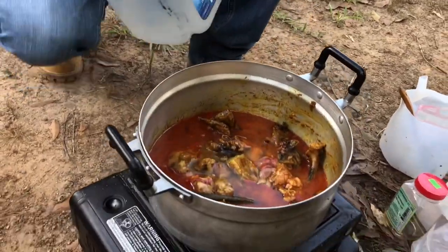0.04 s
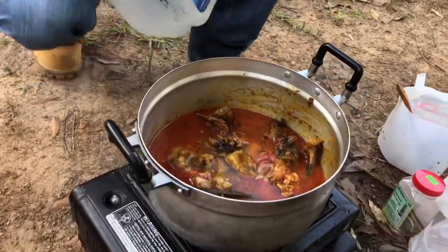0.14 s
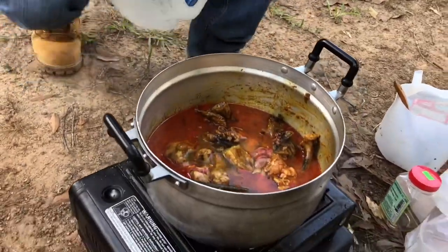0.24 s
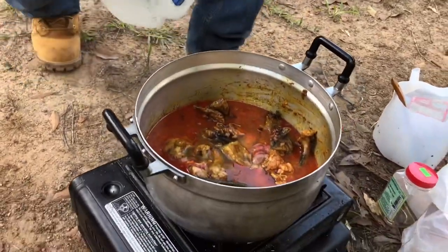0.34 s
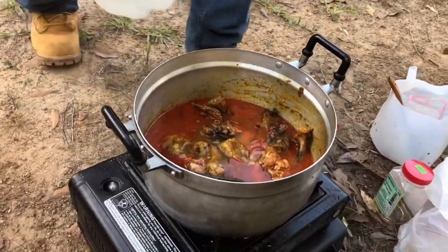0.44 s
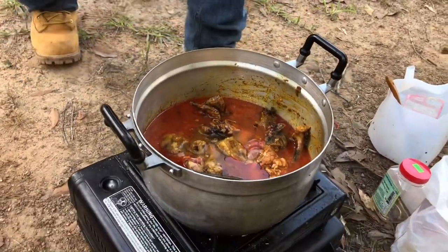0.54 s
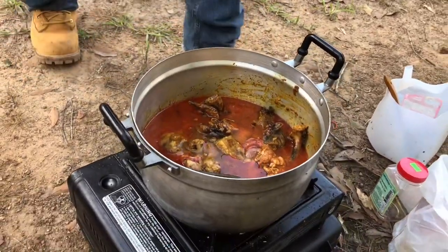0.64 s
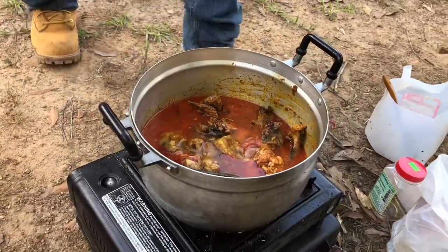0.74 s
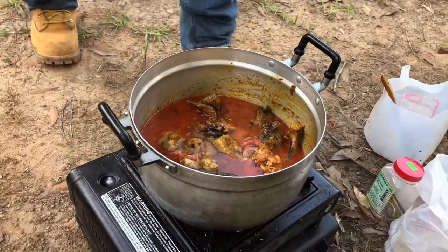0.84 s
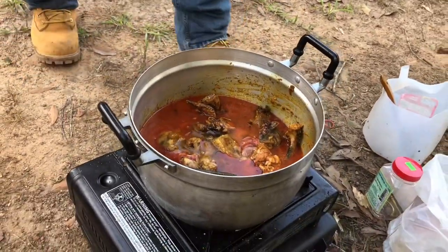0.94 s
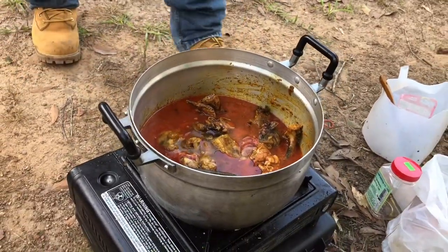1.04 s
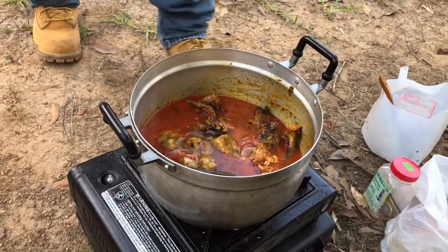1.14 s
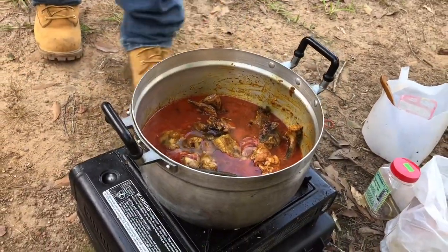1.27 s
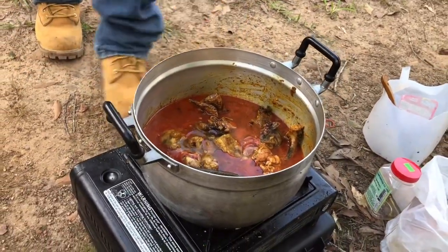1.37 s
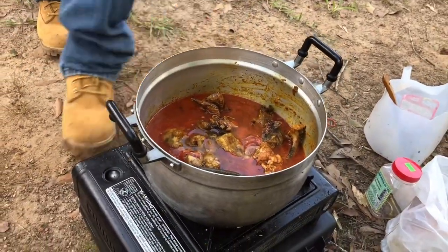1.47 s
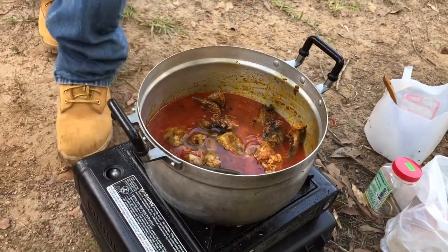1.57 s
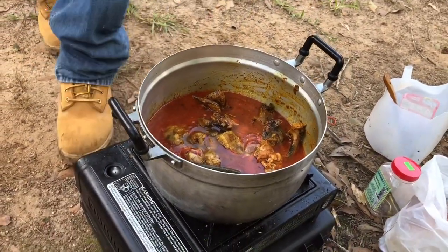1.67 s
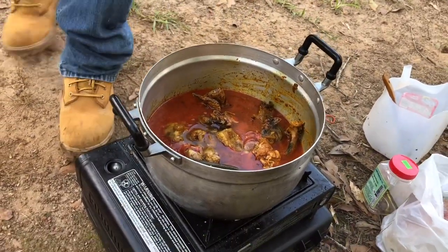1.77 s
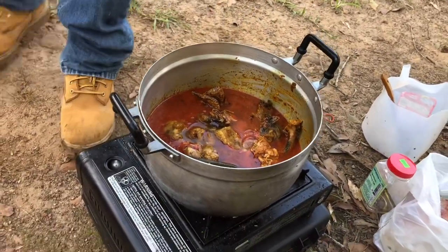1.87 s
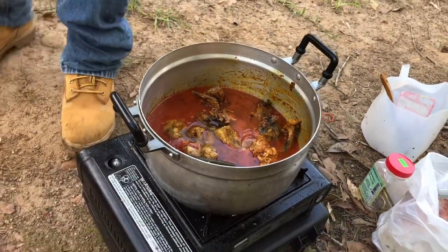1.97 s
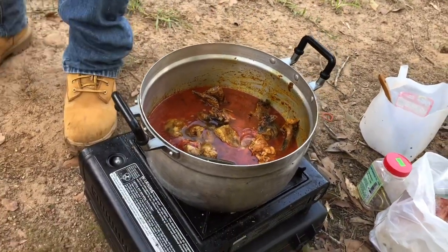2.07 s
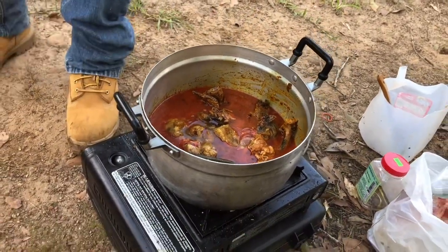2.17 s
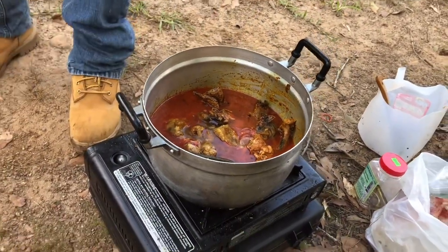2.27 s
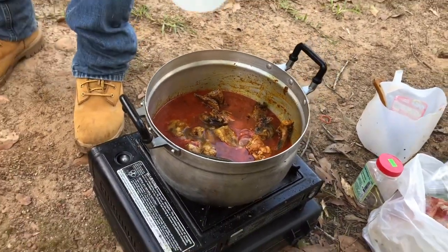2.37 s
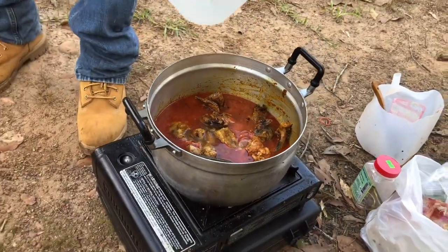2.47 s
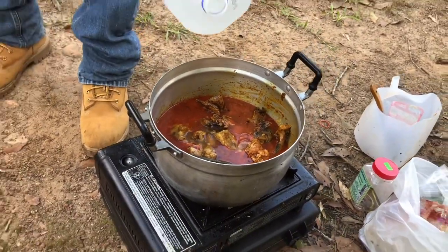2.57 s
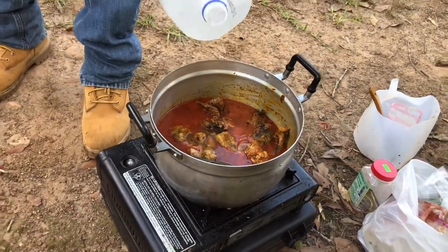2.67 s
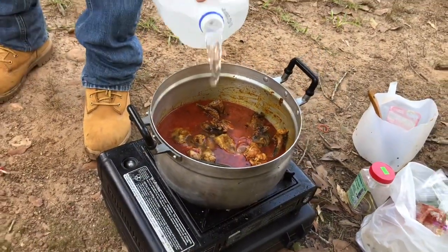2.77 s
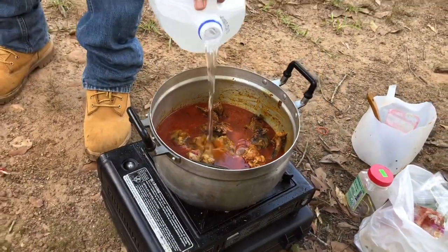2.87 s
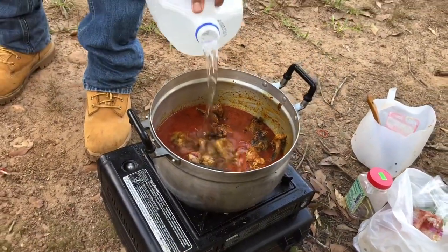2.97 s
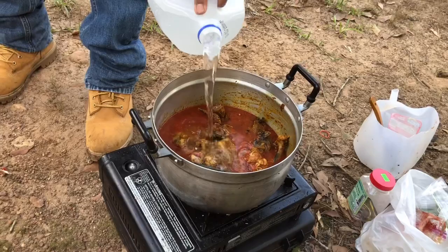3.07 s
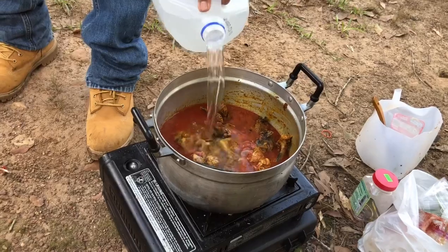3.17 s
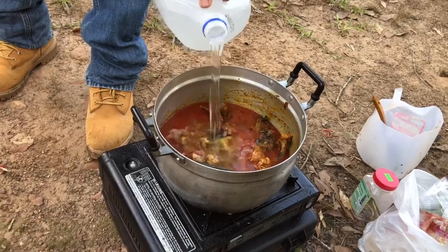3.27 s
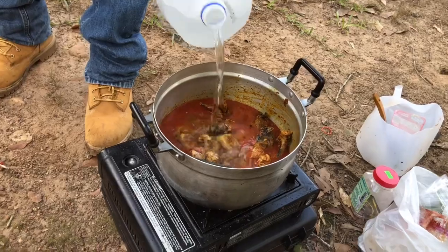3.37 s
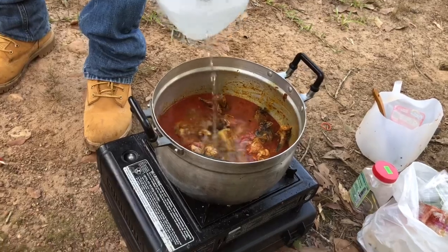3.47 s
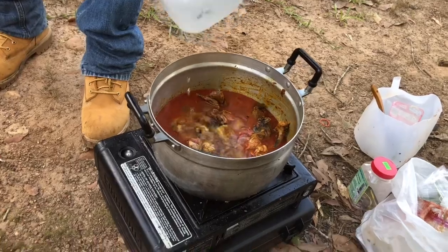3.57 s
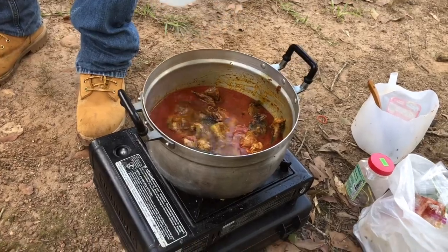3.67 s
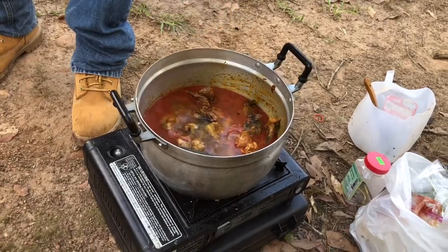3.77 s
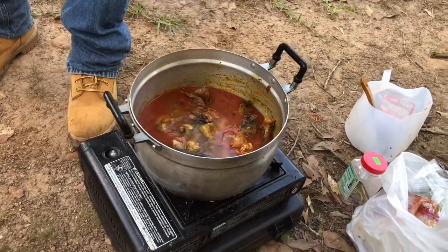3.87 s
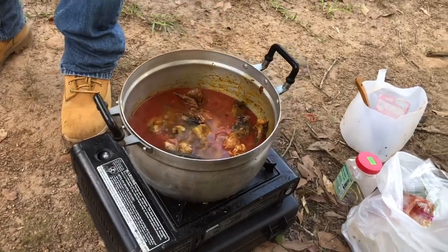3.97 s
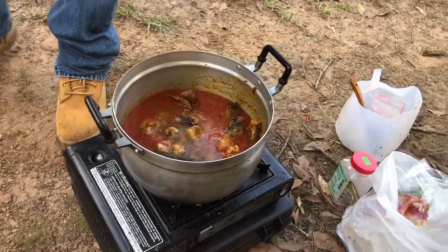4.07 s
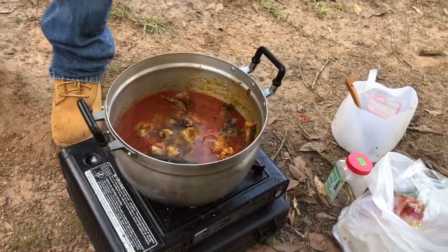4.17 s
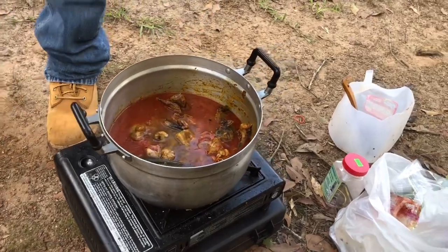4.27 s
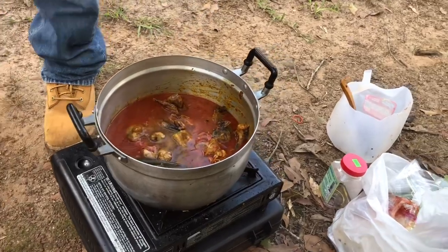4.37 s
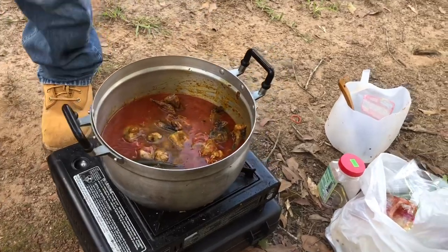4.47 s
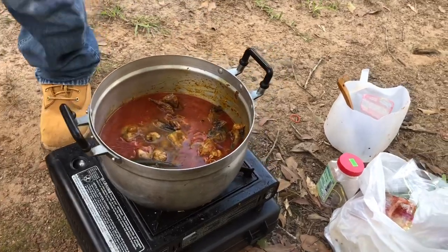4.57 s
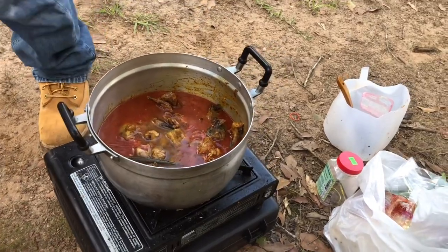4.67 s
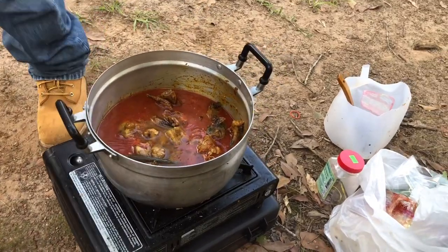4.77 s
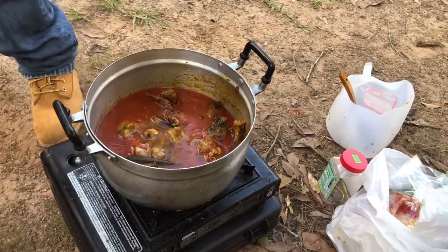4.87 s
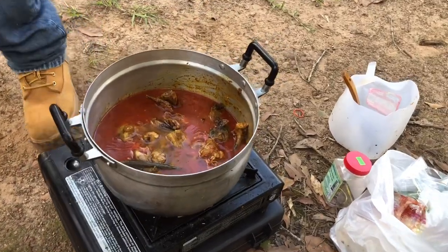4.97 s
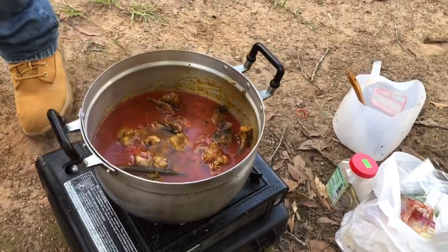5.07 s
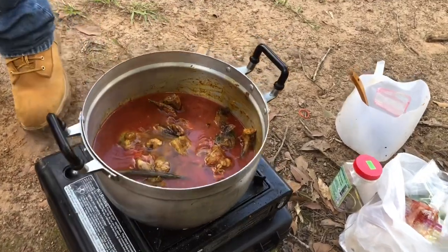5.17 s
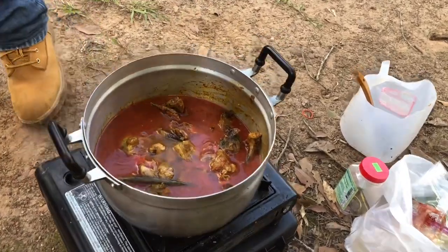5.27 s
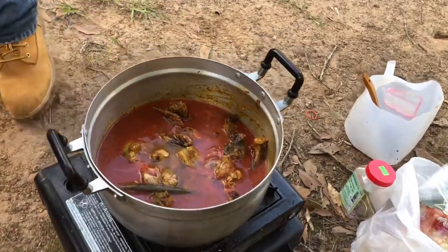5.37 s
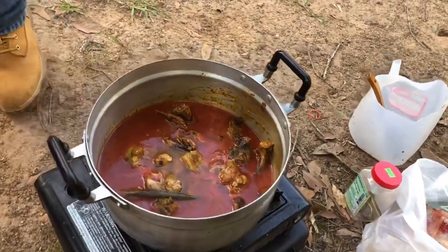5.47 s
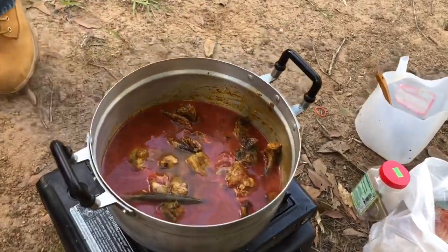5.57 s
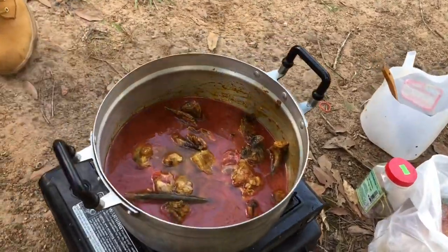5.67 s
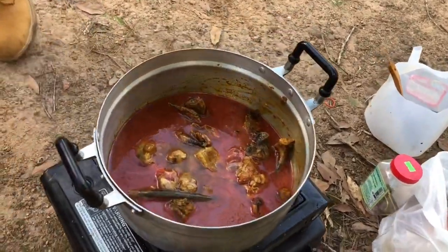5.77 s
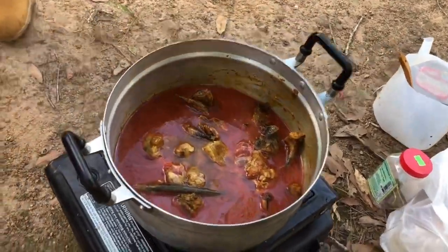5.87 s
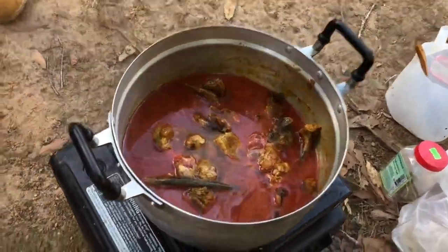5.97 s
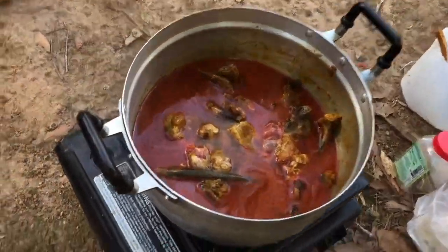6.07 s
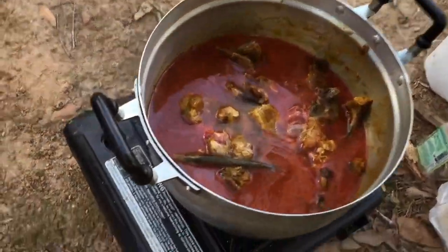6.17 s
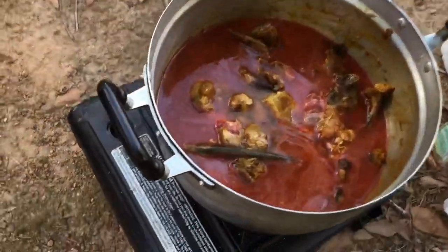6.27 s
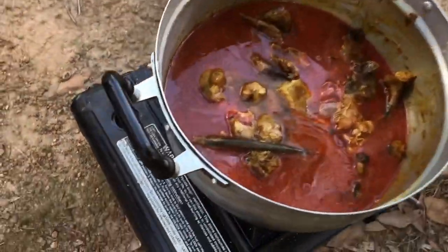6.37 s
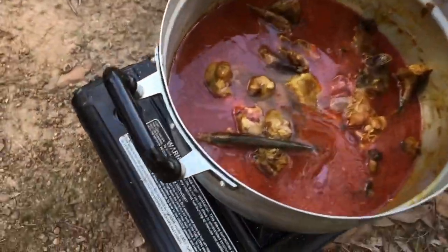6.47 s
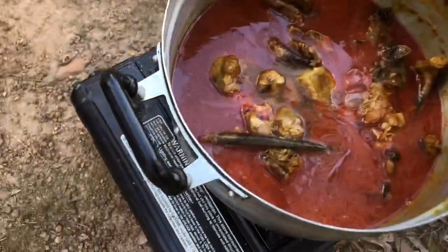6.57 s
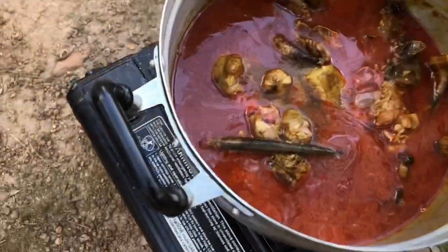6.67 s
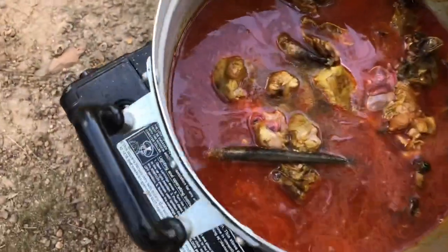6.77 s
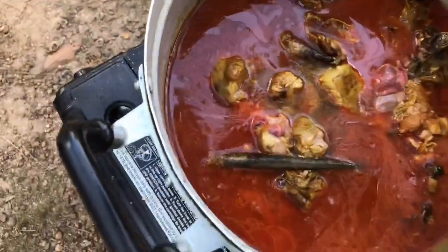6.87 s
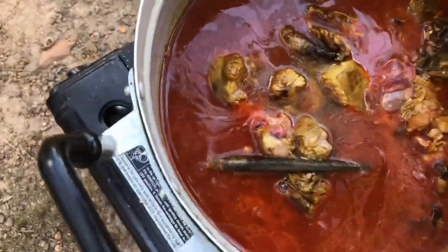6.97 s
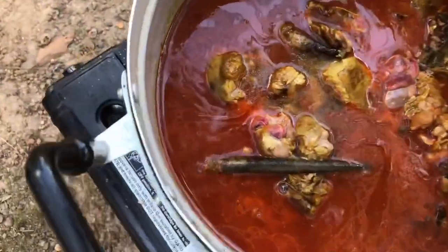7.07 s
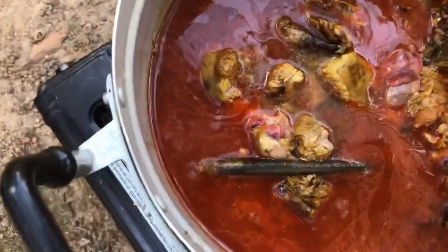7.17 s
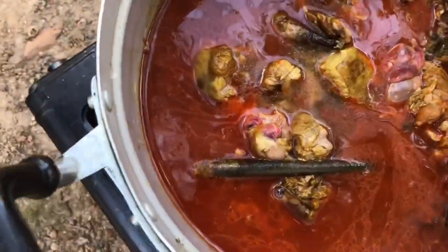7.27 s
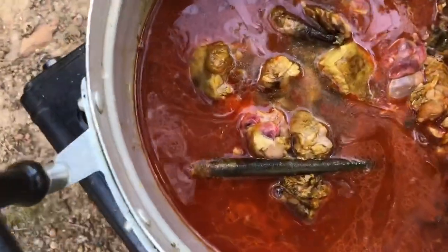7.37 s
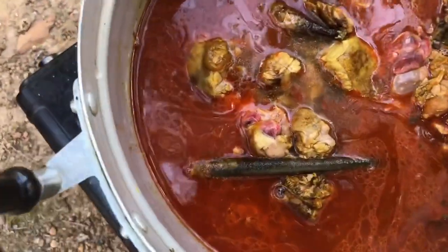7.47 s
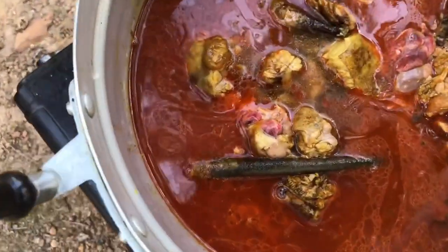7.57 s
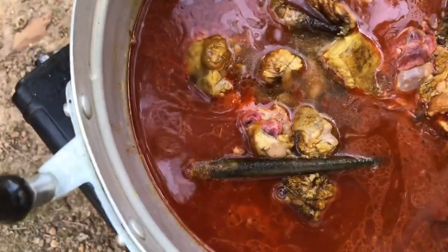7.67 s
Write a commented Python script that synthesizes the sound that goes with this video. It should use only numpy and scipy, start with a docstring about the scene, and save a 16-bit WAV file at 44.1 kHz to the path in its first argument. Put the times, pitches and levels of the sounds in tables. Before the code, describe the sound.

Outdoors, plastic jug knocks and boots scuffing on dry soil and leaves, then a brief splashing water pour with one glug, over a soft simmer.

```python
"""Pouring water into a camp stew

Outdoors, close to a camp stove, water is poured from a plastic jug into a metal pot of stew: swarms of
ringing bubbles, fizz, spray and one hollow glug. The jug and small things knock as ragged contacts ringing,
a bit of metal jingles in its modes, boots shuffle on dry soil and leaves as clouds of grains, twigs click.
Behind them the stew simmers as noise and ticks, a bird far away whistles falling notes as gliding sines,
and the outdoor hush and slow wind on the microphone are coloured noise."""
import sys
import numpy as np
from scipy import signal
from scipy.fft import rfft, irfft, next_fast_len
from scipy.io import wavfile
from scipy.ndimage import uniform_filter1d

SR = 44100
rng = np.random.default_rng(int(sys.argv[2]) if len(sys.argv) > 2 else 0)


def generate_wav(sig):
    """Save sig (samples, or channels by samples) to the path in sys.argv[1] as 16-bit PCM at SR."""
    pcm = np.round(np.clip(np.atleast_2d(sig).T, -1, 1) * 32767).astype(np.int16)
    wavfile.write(sys.argv[1], SR, pcm)


N = 340614


def gain_of(db):
    """Decibels to amplitude."""
    return 10 ** (np.asarray(db) / 20)


def evened(x):
    """Scales to rms 1."""
    return x / np.sqrt(np.mean(x ** 2) + 1e-20)


def peaked(x, db):
    """Scales to a peak of db."""
    return gain_of(db) * x / (abs(x).max() + 1e-12)


def along(rows, outside_db=-120):
    """A curve through (s, dB) rows at every sample."""
    rows = np.asarray(rows)
    return np.interp(np.arange(N) / SR, rows[:, 0], rows[:, 1], outside_db, outside_db)


def coloured(x, points):
    """Shapes the spectrum of x by (Hz, dB) points, at rms 1."""
    size = next_fast_len(N + 4096)
    point_hz, point_db = np.transpose(points)
    hz = np.fft.rfftfreq(size, 1 / SR)
    curve_db = np.interp(np.log(hz + 1), np.log(point_hz + 1), point_db)
    return evened(irfft(rfft(x, size) * gain_of(curve_db), size)[:N])


def band(x, hz, octaves):
    """A gentle band-pass around hz."""
    edges = np.clip(hz * 2. ** (np.array([-1, 1]) * octaves / 2), 20, 20000)
    return signal.lfilter(*signal.butter(1, edges / SR * 2, "band"), x)


def add(mix, s, sound):
    """Mixes a sound in at time s, trimmed at both ends of the mix."""
    at = round(s * SR)
    part = mix[max(at, 0):][:len(sound) + min(at, 0)]
    part += sound[max(-at, 0):][:len(part)]


def ring(hz, t60, glide=0., rise_s=0.0003):
    """A dying sine whose pitch may climb, as a bubble's does."""
    t = np.arange(SR // 6) / SR
    wave = np.sin(2 * np.pi * hz * t * (1 + glide * np.minimum(t / t60, 1)))
    return wave * gain_of(-60 * t / t60) * (1 - np.exp(-t / rise_s))


def grains(per_s, spread_db):
    """Sparse clicks of random sign, a few of them large."""
    size = gain_of(spread_db * np.minimum(rng.exponential(1, N), 4)) * rng.choice([-1, 1], N)
    return size * (rng.random(N) < per_s / SR)


def rattle(sound, lasting_s):
    """Plays a ring from a firm first touch and a ragged, dying run of lighter ones."""
    t = np.arange(0, 4 * lasting_s, 1 / SR)
    touches = rng.standard_normal(len(t)) ** 3 * np.exp(-t / lasting_s)
    return signal.fftconvolve(sound, touches / np.linalg.norm(touches) + (t == 0))


def yard(x, t60):
    """Sparse scattered echoes from ground, stove and trees."""
    taps = np.zeros(12000)
    places = 200 + np.arange(0, 11700, 20) + rng.integers(0, 20, 585)  # one echo in every 20 samples
    taps[places] = rng.choice([-1., 1.], 585)
    taps *= gain_of(-60 * np.arange(len(taps)) / SR / t60)
    return signal.fftconvolve(x, taps / np.linalg.norm(taps))[:N]


def air():
    """Distant outdoor hush with drifting patches; its treble follows the breeze in the leaves."""
    # spectrum of the hush: freq_hz, density_db
    hush = [(40, 3), (120, 2), (300, -5.5), (850, -9), (1050, -6), (1500, -15.5), (3300, -21),
            (3800, -15.5), (4500, -30), (5250, -22), (7000, -32), (16000, -38.5)]
    # breeze in the leaves: time_s, treble_gain_db
    leaf_breeze = [(0, 6), (5.3, 7), (6.1, 4), (7.72, 4.5)]
    hz, t, spectra = signal.stft(coloured(rng.standard_normal(N), hush), SR, nperseg=512)
    patches = uniform_filter1d(rng.standard_normal(spectra.shape), 6, 0)  # smooth across pitch
    patches = evened(uniform_filter1d(patches, 14, 1))  # and across time
    treble = hz ** 2 / (hz ** 2 + 2000 ** 2)
    treble_db = np.outer(treble, np.interp(t, *np.transpose(leaf_breeze)))
    return gain_of(-55) * signal.istft(spectra * gain_of(1.8 * patches + treble_db), nperseg=512)[1][:N]


def wind():
    """Slow pressure swings on the microphone, of fairly even size within a gust."""
    # strength of the wind: time_s, level_db
    strength = [(0, -29), (2.95, -25), (3.07, -18.5), (4.0, -28), (4.98, -24), (5.08, -18.5), (5.4, -26),
                (6.5, -22), (6.63, -18), (7.09, -17), (7.2, -23), (7.73, -27)]
    # spectrum of the swings: freq_hz, density_db
    gust = [(3, -6), (8, 0), (15, 0), (25, -19), (45, -36), (70, -51), (250, -57), (600, -100)]
    swings = coloured(rng.standard_normal(N), gust)
    window = signal.windows.hann(SR // 3) * 6 / SR
    local_power = signal.oaconvolve(swings ** 2, window, "same").clip(0)
    return gain_of(along(strength)) * evened(swings / np.sqrt(local_power + .3))


def bird():
    """Each whistle rounds over its top, slides loudly to a common low note, breaks, springs back and sinks."""
    # far-off whistles: start_s, top_hz, peak_db
    whistles = [(2.187, 3120, -47.5), (2.391, 2825, -47.5), (2.585, 2760, -48), (2.773, 2740, -50),
                (4.249, 2760, -52), (4.439, 2800, -53), (4.629, 2700, -50.5), (7.534, 3014, -45)]
    top_s, low_s, rebound_s, note_s = 0.022, 0.072, 0.086, 0.132  # top, bottom, spring back, end
    low_hz, rebound_hz, end_hz = 2310, 2310 + 190, 2340
    out, t = np.zeros(N), np.arange(0, note_s, 1 / SR)
    swell_s = [0, top_s, 0.57 * low_s, low_s, rebound_s, note_s]
    swell = gain_of(np.interp(t, swell_s, [-12, 0, 0, -12, -6, -10]))  # dB re the peak
    swell = swell * signal.windows.tukey(len(t), .2)
    pitch_s = [0, top_s, low_s, 1.1 * low_s, rebound_s, note_s]
    for start, top_hz, db in whistles:
        hz = np.interp(t, pitch_s, [0.95 * top_hz, top_hz, low_hz, low_hz, rebound_hz, end_hz])
        hz = uniform_filter1d(hz, size=400, mode="nearest")
        add(out, start, gain_of(db) * swell * np.sin(2 * np.pi * np.cumsum(hz) / SR))
    return out + gain_of(-8) * yard(out, t60=0.2)  # smeared by the trees


def simmer():
    """The stew ticks over softly on the hiss of the burner."""
    # spectrum of stew and burner: freq_hz, density_db
    stew = [(100, 5.5), (300, 2.5), (900, -7), (1650, -4), (4500, -55), (6600, -17), (9000, -33.5)]
    # the microphone closing in on the pot: time_s, level_db
    nearing = [(5.6, -57), (6.2, -57.5), (7.73, -52.5)]
    return gain_of(along(nearing)) * coloured(rng.standard_normal(N) + grains(60, 9.3), stew)


def thuds():
    """A heel pushes the ground: a couple of low cycles with a slower octave above."""
    # heels on the ground: start_s, peak_db, pitch_hz
    heels = [(1.758, -30, 106), (3.049, -37, 116), (3.175, -33, 134), (4.187, -37, 140), (6.76, -39.5, 278)]
    out = np.zeros(N)
    for s, db, hz in heels:
        octave = 0.5 * ring(hz * 2.0, 0.12, rise_s=0.0068)
        add(out, s, peaked(ring(hz, 0.087, rise_s=0.0011) + octave, db))
    return out


def shuffle():
    """Each scuff grinds soil in dense dull grains and crushes dry leaves in sharper ones."""
    # scuffs of boots and hands: start_s, length_s, soil_db, leaves_db
    scuffs = [(0.022, 0.076, -47, -49), (0.083, 0.053, -43.5, -50.5), (0.195, 0.055, -40, -52.5),
              (0.456, 0.058, -33, -59), (0.485, 0.14, -50.5, -49.5), (1.077, 0.035, -40.5, -44),
              (1.464, 0.13, -41.5, -58.5), (1.549, 0.32, -48, -56), (1.998, 0.1, -50, -50),
              (2.724, 0.13, -85, -50), (3.023, 0.099, -50, -75), (4.027, 0.063, -49, -68),
              (4.138, 0.088, -46.5, -52.5), (4.281, 0.091, -42.5, -56), (4.43, 0.099, -35, -58),
              (4.553, 0.22, -46, -51), (4.833, 0.14, -42, -44.5), (4.922, 0.32, -56, -50),
              (5.13, 0.4, -56, -50.5), (5.586, 0.073, -36.5, -67), (5.734, 0.056, -38, -48.5),
              (6.06, 0.2, -47, -55.5), (7.266, 0.074, -48.5, -51.5), (7.409, 0.068, -49.5, -53)]
    # spectrum of the dull grind: freq_hz, density_db
    soil_colour = [(120, -15), (300, 1.5), (800, -5), (1050, 1), (1900, -18), (4000, -28), (8000, -100)]
    # spectrum of the leaf crackle: freq_hz, density_db
    leaf_colour = [(1000, -0.5), (2200, 6.5), (3700, 4.5), (5500, -8), (11000, -12.5), (16000, -19)]
    soil = coloured(grains(700, 4.2) + .5 * rng.standard_normal(N), soil_colour)
    leaves = coloured(grains(300, 7) + .9 * rng.standard_normal(N), leaf_colour)
    lumps = gain_of(3.6 * evened(uniform_filter1d(rng.standard_normal(N), 300)))
    dull, sharp = np.zeros((2, N))
    for s, length, soil_db, leaf_db in scuffs:
        size = round(length * SR)
        # 0.68 of a scuff is spent pressing down and lifting off
        stroke = signal.windows.tukey(size, 0.68) * np.linspace(1, .5, size)
        add(dull, s, gain_of(soil_db) * stroke)
        add(sharp, s, gain_of(leaf_db) * stroke)
    return lumps * (dull * soil + sharp * leaves)


def snaps():
    """Twigs and leaf veins break, drips tick: a millisecond click; faint ones come at random."""
    # twigs, leaves and last drips: start_s, peak_db, centre_hz
    clicks = [(0.7732, -30.5, 1900), (1.958, -34, 3350), (2.113, -30.5, 3350), (2.1895, -34.5, 3100),
              (2.6248, -27, 1780), (2.646, -31, 2920), (3.9653, -37.5, 3350), (4.558, -34.5, 3170),
              (5.0682, -30.5, 3030), (5.263, -33, 3680), (5.674, -33, 3200), (5.888, -34, 13000),
              (6.357, -32.5, 3830), (6.6712, -38.5, 3440), (7.0222, -35, 4300), (7.3308, -33.5, 3800),
              (7.5185, -35.5, 3060), (7.6153, -27.5, 2630), (.955, -37, 1790), (1.523, -31, 2150),
              (3.802, -43, 10700), (4.768, -38.5, 2530), (5.18, -35, 1690), (5.222, -28, 1900),
              (5.3134, -34, 3480), (5.4275, -36.5, 2940), (5.567, -37.5, 3760), (5.733, -36.5, 3400),
              (6.515, -42.5, 3120), (7.6528, -36, 2500)]
    out, t = np.zeros(N), np.arange(400) / SR
    for (s, db, hz), noise in zip(clicks, rng.standard_normal((len(clicks), len(t)))):
        click = (noise + 3 * (t == 0)) * np.exp(-t / 0.0027)
        add(out, s, peaked(band(band(click, hz, 0.68) + 0.08 * click, hz, 1.8), db))
    for hz in np.geomspace(2230, 13000, num=5):
        faint = band(band(grains(6, 4.), hz, .9), hz, .9)
        out += gain_of(-41) * faint * 4000 / hz  # weaker towards the treble
    return out


def scrape():
    """A short scrape: dense slips sound through one narrow hollow."""
    # the scrape, a single row: start_s, length_s, level_db, hollow_hz
    s, length, db, hz = (5.446, .045, -42, 790)
    out, size = np.zeros(N), round(length * SR)
    slips = band(band(rng.standard_normal(size), hz, .4), hz, .4)
    add(out, s, gain_of(db) * evened(slips) * signal.windows.tukey(size))
    return out


def clinks():
    """Each blow rattles the modes of the metal part in another mix; higher modes ring longer."""
    # blows on the jingling part: start_s, peak_db
    blows = [(.533, -35), (0.569, -37), (.889, -31), (0.914, -32), (.986, -35)]
    # modes of the metal before each blow's random mix: mode_hz, level_db
    metal = [(1650, -4), (2060, -3), (2665, -4), (2980, -1), (4120, -5), (4420, -5), (6660, -19),
             (9190, -14), (10300, -15)]
    out = np.zeros(N)
    mix_db = 4 * rng.standard_normal((len(blows), len(metal)))
    for (s, db), mix in zip(blows, mix_db):
        modes = np.zeros(SR // 6)
        for (hz, mode_db), change_db in zip(metal, mix):
            modes += gain_of(mode_db + change_db) * ring(hz, 0.026 * np.sqrt(hz / 1000))
        tick = 6 * ring(4000, .001)
        add(out, s, peaked(rattle(modes + tick, .012), db))
    return out


def knocks():
    """Ragged contact, sharp at first, sounds through a broad hump, a short ring and a low hollow, plus a crack."""
    # knocks of the jug and small things: start_s, peak_db, ring_hz, crack_db (re the peak)
    hits = [(0.06, -28.5, 1660, -24), (0.074, -29, 1410, -19), (0.173, -18.5, 1070, -20),
            (0.208, -31.5, 1110, -4), (0.248, -19.5, 1000, -8), (0.466, -39, 960, 5),
            (0.482, -11.5, 1480, -5), (0.499, -28.5, 980, -9), (0.887, -27, 2900, -5),
            (0.982, -34.5, 1010, -1.5), (1.095, -23, 3700, -13), (1.468, -30, 480, -32),
            (1.508, -23.5, 830, -43), (3.197, -27, 1020, -20), (4.02, -26, 1100, -40),
            (4.059, -34, 665, -35), (4.158, -34, 620, -17), (4.298, -22, 990, -26), (4.331, -33, 850, -29),
            (4.478, -23, 1010, -32), (4.488, -22.5, 770, -10.5), (4.669, -26.5, 1020, -28),
            (4.85, -27.5, 920, -19), (4.885, -24.5, 1120, -14), (5.052, -24.5, 1050, -11),
            (5.199, -31, 980, 2), (5.48, -28, 920, -9), (5.539, -24, 900, -14), (5.574, -31.5, 860, -6),
            (5.6, -23.5, 1130, -10.5), (5.799, -26.5, 1220, -13), (5.876, -34, 1080, -2.5),
            (5.917, -32, 1220, -3.5), (6.092, -23, 1200, -42), (6.341, -34, 1130, -30),
            (6.761, -32, 1100, -5), (7.441, -29.5, 1040, -16)]
    hollow_hz = 313  # under every knock
    out, t = np.zeros(N), np.arange(2000) / SR
    chance = rng.standard_normal((len(hits), 3, len(t)))
    contact_fade = np.exp(-t / 0.0035) + 0.21 * np.exp(-t / 0.01)
    crack_fade = np.exp(-t / 0.0022) + 0.07 * np.exp(-t / 0.0026)
    hollow = ring(hollow_hz, .05, rise_s=.004)[:len(t)]
    for (s, db, hz, crack_db), (touch, grit, roughness) in zip(hits, chance):
        contact = touch * abs(roughness) * contact_fade
        contact[0] = 2.3  # the first touch
        hump = evened(band(band(band(contact, hz, 0.43), hz, 4.3), hz, 4.3))
        two_rings = ring(hz, 0.018) + 0.5 * ring(hz * 1.45, 0.014)
        rings = evened(signal.fftconvolve(contact, two_rings)[:len(t)])
        crack = band(band(grit * abs(roughness) * crack_fade, 3490, 0.24), 6300, 12.0)
        body = peaked(hump + .3 * rings, db) + gain_of(db - 17) * hollow
        add(out, s, body + peaked(crack, db + crack_db))
    return out


def bubble_swarms():
    """Small bubbles of a few favoured sizes ring and climb in pitch, in clumps; large and small ones apart."""
    # favoured bubble sizes: pitch_hz (before scatter), level_db
    favoured = [(1950, 0), (2690, 4), (3470, 8.5), (4510, 6.5), (5250, 10.5), (6100, 5)]
    large_small = np.zeros((2, N))
    for hz, db in favoured * 8:
        pitch = hz * (1 + 0.09 * rng.standard_normal())
        drift = evened(uniform_filter1d(rng.standard_normal(N // 256 + 1), 4))
        clumps = gain_of(5.5 * drift).repeat(256)[:N]
        bubble = gain_of(db) * ring(pitch, 28 / pitch, glide=0.04, rise_s=0.001)
        is_small = int(hz > 4000)
        large_small[is_small] += signal.oaconvolve(clumps * grains(130, 5.4), bubble)[:N]
    return evened(large_small[0]), evened(large_small[1])


def droplet_spray():
    """Droplets burst in short high patches of noise over a steady floor."""
    spray = np.zeros(N)
    for hz in np.geomspace(7400, 15000, num=5):
        bursts = signal.oaconvolve(abs(grains(45, 4.5)), signal.windows.hann(200), "same")
        spray += (bursts + 0.36) * band(band(rng.standard_normal(N), hz, 0.53), hz, 0.53)
    return evened(spray)


def glug():
    """Air gulped into the jug rings its hollow."""
    # modes of the jug: mode_hz, level_db (re one another), t60_s
    hollow_modes = [(290, -4, 0.04), (455, -3.5, 0.055), (503, -2, 0.05), (950, -7, 0.025)]
    modes = sum(gain_of(db) * ring(hz, t60, rise_s=0.0089) for hz, db, t60 in hollow_modes)
    return peaked(modes, -17)


def water():
    """Bubbles, fizz and spray follow the stream, with splashes, single plinks and a glug."""
    # the stream: time_s, strength_db, small_bubbles_db (re large)
    stream = np.array([(2.885, -57, -9), (2.975, -48.5, 4.5), (3.045, -53.5, -3.5), (3.206, -50, 3),
                       (3.255, -53, -5), (3.31, -49, 1.5), (3.4, -55, 5.5), (3.46, -55.5, 1.5),
                       (3.575, -50, 7.5), (3.625, -64.5, -8), (3.98, -63.5, 0)])
    # splashes that throw up extra spray: centre_s, level_db
    splashes = [(3.366, -52), (3.527, -40.5)]
    # clear plinks in the jug and the stream: start_s, peak_db, pitch_hz
    plinks = [(2.254, -42, 8450), (2.9634, -34, 6020), (2.9866, -33, 1990), (3.142, -37.5, 1950),
              (3.233, -32.5, 1920), (3.3268, -34.5, 3320), (3.356, -36, 1910), (3.3785, -33.5, 3420),
              (3.451, -25, 5040), (3.5287, -24.5, 5320), (3.5665, -28, 5170)]
    splash_s = 0.022
    large, small = bubble_swarms()
    spray = droplet_spray()
    fizz = evened(band(band(rng.standard_normal(N) + grains(900, 6), 4000, 1.5), 4000, 1.5))
    flow, small_share = gain_of(along(stream)), gain_of(along(stream[:, ::2]))
    thrown = np.zeros(N)
    for s, db in splashes:
        add(thrown, s - splash_s / 2, gain_of(db) * signal.windows.hann(round(splash_s * SR)))
    out = flow * (large + small_share * small + gain_of(-8) * fizz)
    out += (gain_of(-5.5) * flow + thrown) * spray
    for s, db, hz in plinks:
        add(out, s, peaked(ring(hz, 45 / hz, glide=0.03, rise_s=0.0008), db))
    add(out, 3.208, glug())
    return out


def scene():
    """Near sounds with a little ground echo, over simmer, bird, air and wind."""
    near = knocks() + snaps() + clinks() + water()
    near = near + gain_of(-14.0) * yard(near, t60=0.047)
    ground = shuffle() + scrape() + thuds()
    background = simmer() + bird() + air() + wind()
    return (near + ground + background)[None]


def record(dry):
    """The band limit of the recorder, a steep low-pass."""
    edge_hz = 15900
    low_pass = signal.firwin(511, edge_hz, window=("kaiser", 9), fs=SR)
    return signal.oaconvolve(dry, low_pass[None], "same")


dry = scene()
out = record(dry)
generate_wav(out)
```